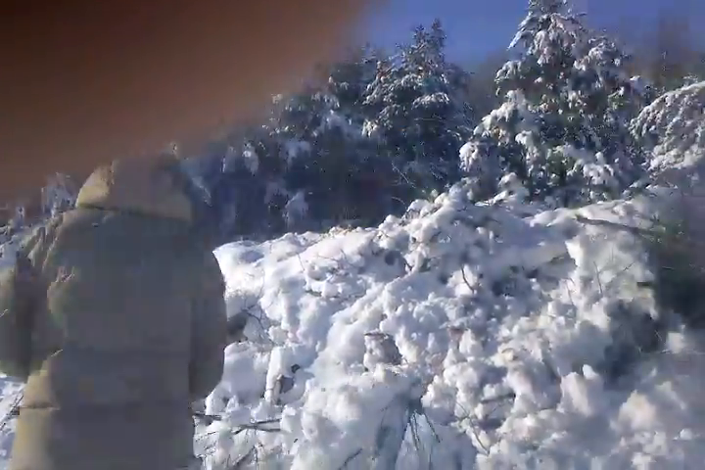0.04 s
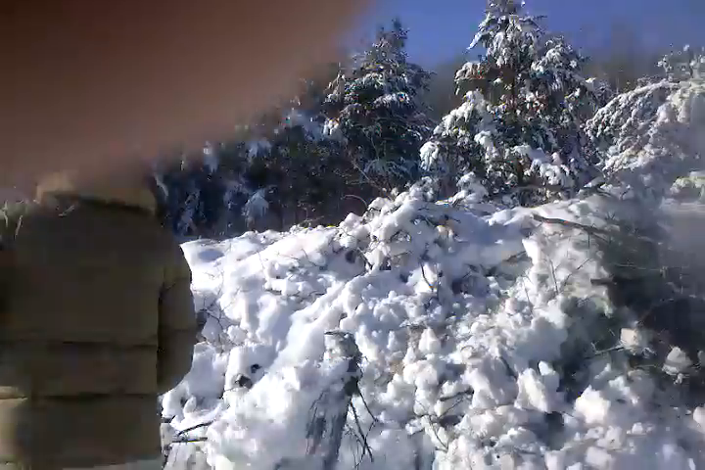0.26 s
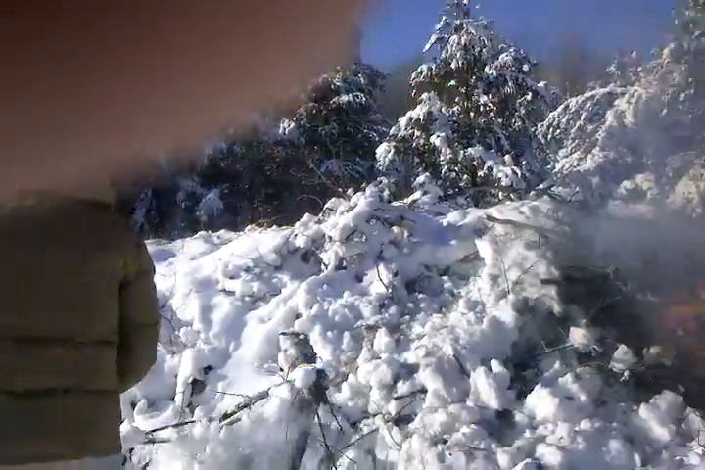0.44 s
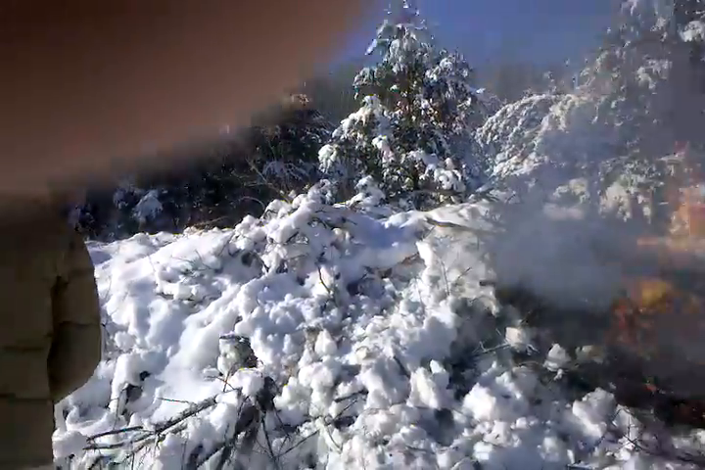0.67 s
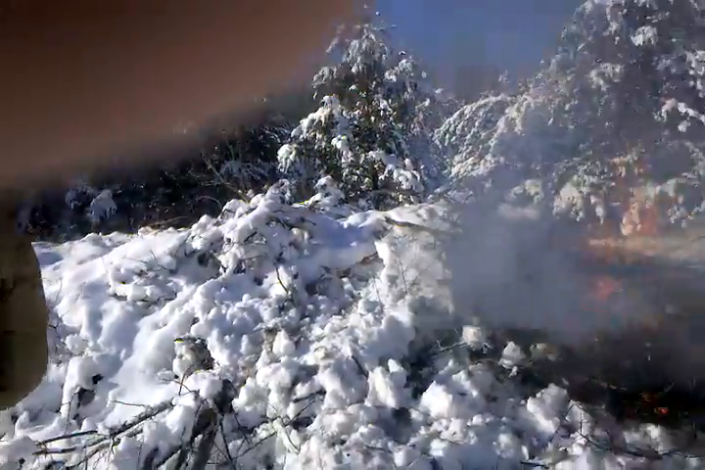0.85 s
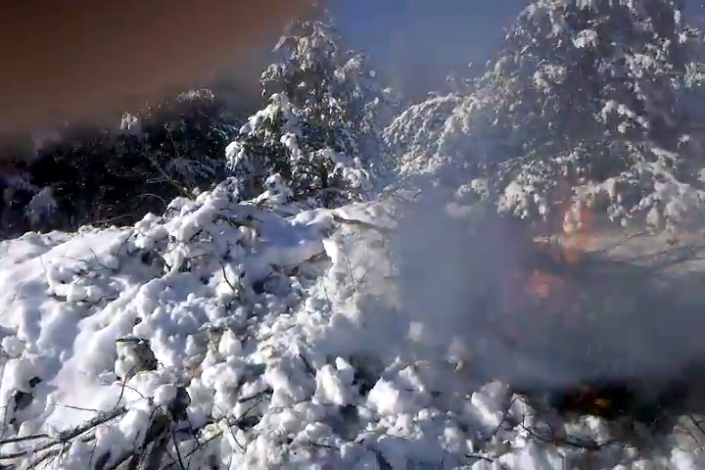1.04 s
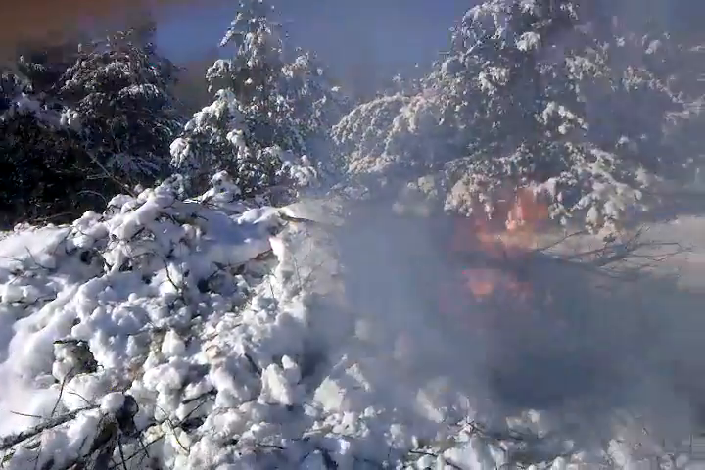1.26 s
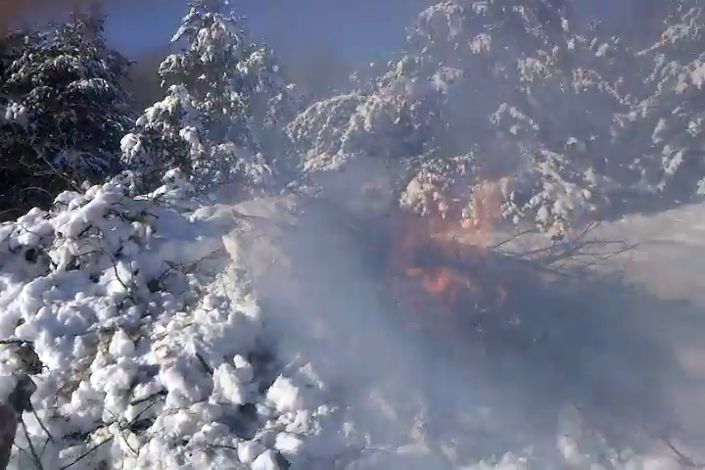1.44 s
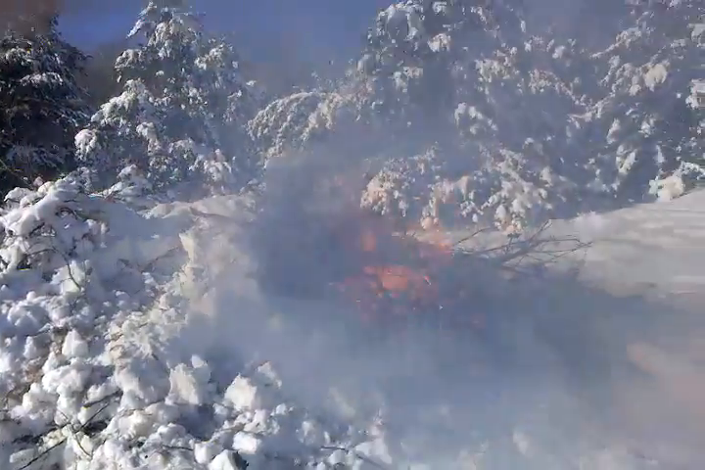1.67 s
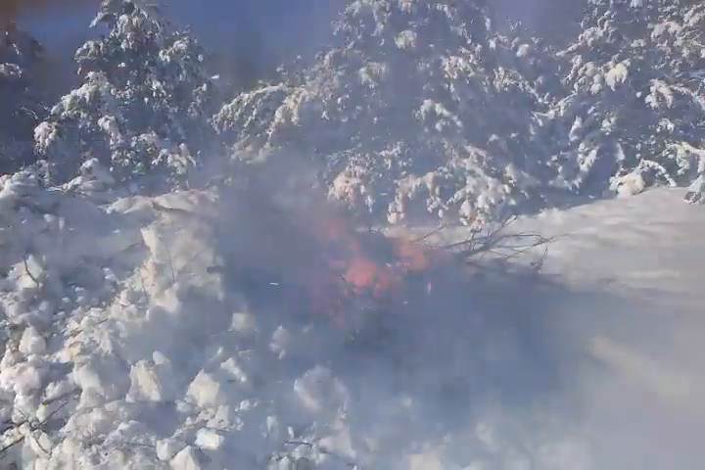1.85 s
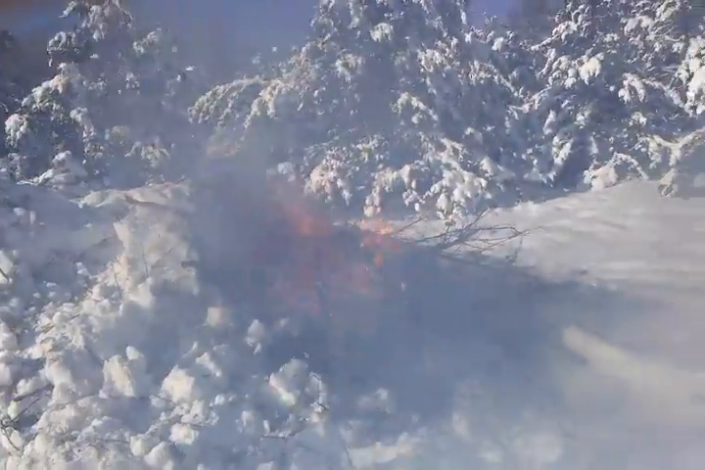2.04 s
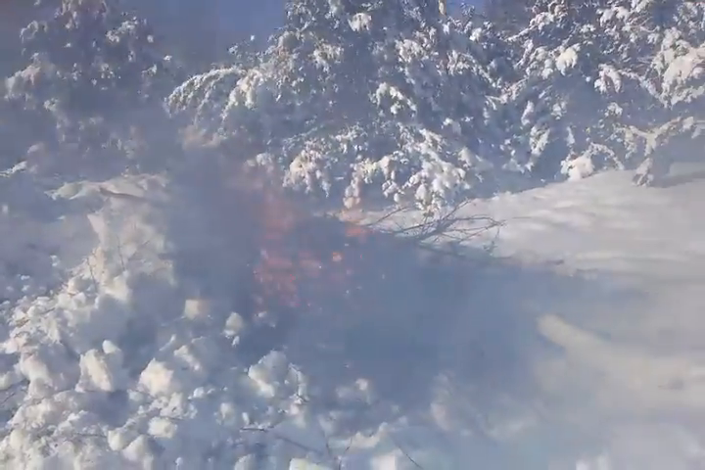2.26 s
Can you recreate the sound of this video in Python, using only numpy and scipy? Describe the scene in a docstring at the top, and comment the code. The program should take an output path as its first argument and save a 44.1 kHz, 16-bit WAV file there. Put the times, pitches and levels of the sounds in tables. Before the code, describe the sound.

Flames rush steadily in a pile of wet branches in a snowy clearing. A few quick snaps lead into one sharp pop, followed by hissing and faint crackles, with gentle wind buffeting the small microphone.

```python
"""Flames rush and wet twigs sizzle in a burning brush pile, while light wind rumbles on the microphone.
Twigs crackle as they split, and early on a steam pocket bursts a branch with one loud, woody pop.
The pile scatters that crack for a moment and the snowy clearing swallows the rest.
The fire burns on under soft bumps of air, heard through a small camera microphone with little treble."""
import sys
import numpy as np
from scipy import signal
from scipy.fft import rfft, irfft
from scipy.io import wavfile
from scipy.ndimage import uniform_filter1d

SR = 44100
rng = np.random.default_rng(int(sys.argv[2]) if len(sys.argv) > 2 else 0)


def pcm_store(signal):
    """Save signal as 16-bit PCM."""
    levels = np.round(np.clip(np.atleast_2d(signal), -1, 1) * 32767)
    wavfile.write(sys.argv[1], SR, levels.astype(np.int16).T)


N = 105840
T = np.arange(N) / SR

# strength of the flames (time [s], roar level [dB], rush level [dB])
FLAME_LEVELS = [(0, -62, -53), (.13, -60, -53.5), (.2, -65, -56.5), (.28, -67, -61), (.38, -69.5, -62.5),
                (.6, -64, -63), (.71, -66.5, -65), (.86, -64.5, -63), (.98, -64, -61.5), (1.13, -67.5, -59),
                (1.26, -65.5, -60.5), (1.35, -61.5, -63), (1.44, -59.5, -57.5), (1.53, -58, -52.5),
                (1.62, -58, -56), (1.8, -56.5, -56), (1.95, -58, -58), (2.17, -57.5, -60),
                (2.32, -56.5, -61), (2.4, -59.5, -58)]
# tone of the low roar, the brighter rush and the hollow flare (frequency [Hz], level [dB])
ROAR_TONE = [(120, -20), (260, -3), (370, -3.5), (550, -0.5), (750, -6.5), (1000, -11), (1600, -28.5),
             (4000, -47.5)]
RUSH_TONE = [(300, -23.5), (650, -1), (900, -1.5), (1100, -3.5), (1500, 2), (1850, 0), (2250, -3.5),
             (2900, -15.5), (4000, -8.5), (7500, -25.5)]
FLARE_TONE = [(200, -22), (500, -9), (800, 5.5), (1050, 2.5), (1400, 0.5), (1800, -6), (2400, -26),
              (5000, -32)]
# gusts that feed the fire (crest time [s], half width [s], rumble level [dB], flare level [dB])
WIND_GUSTS = [(0.282, 0.01, -54, -70), (1.067, 0.11, -75, -60), (1.189, 0.024, -49.5, -53.5),
              (1.324, 0.0083, -51, -69), (2.033, .028, -52.5, -64.5)]

# steam escaping from the wood (time [s], level [dB])
STEAM_LEVELS = [(0, -53.5), (.1, -51.5), (.22, -55), (.37, -54.5), (.46, -61), (.58, -60), (.72, -63.5),
                (.83, -65.5), (.95, -61.5), (1.04, -62), (1.13, -57.5), (1.26, -66), (1.38, -63.5),
                (1.48, -56), (1.66, -60.5), (1.72, -59), (1.78, -58), (1.92, -62.5), (2.03, -61),
                (2.12, -67.5), (2.32, -69), (2.4, -59)]
# short jets of steam (crest time [s], half width [s], level [dB])
STEAM_JETS = [(1.54, 0.029, -54), (1.655, 0.014, -56)]
# tone of the sizzle and of the jets (frequency [Hz], level [dB])
SIZZLE_TONE = [(1000, -39.5), (2200, -1), (3100, -7), (4000, -3.5), (4700, 0), (5500, 1), (6200, -2),
               (6600, 1), (7100, -3), (8000, -11.5)]
JET_TONE = [(1500, -24), (3000, -16), (4000, -2), (5200, 2), (6000, -6), (7000, -7), (8000, -15)]

# breeze on the microphone (time [s], level [dB])
BREEZE_LEVELS = [(0, -56), (.55, -57), (.78, -59), (.92, -56.5), (1.08, -61.5), (1.39, -53.5),
                 (1.65, -54.5), (1.8, -58.5), (1.99, -50), (2.17, -55), (2.4, -54.5)]
# tone of its rumble (frequency [Hz], level [dB])
RUMBLE_TONE = [(20, -32.5), (40, -16.5), (70, -2.5), (125, 0.5), (200, -1), (260, -6), (340, -17),
               (600, -22.5), (2000, -53.5)]
# soft bumps of air on the microphone (time [s], frequency [Hz], envelope level [dB])
AIR_BUMPS = [(.339, 254, -40.5), (0.466, 191, -44), (0.485, 170, -51), (0.57, 180, -48), (.62, 290, -49),
             (1.206, 139, -40), (1.314, 115, -39), (1.327, 120, -40), (1.393, 130, -49),
             (1.477, 208, -43.5), (1.69, 203, -41.5), (1.881, 178, -33.5), (2.024, 198.5, -39),
             (2.055, 198, -39)]

# splitting twigs (time [s], tick level [dB], body level [dB], decay t60 [s])
TWIG_SNAPS = [(0.0367, -31.5, -43, 0.0077), (0.0514, -38, -37.5, 0.0087), (.073, -44, -46, 0.011),
              (0.0972, -26, -29.5, 0.0059), (0.1666, -33.5, -46.5, .016), (.361, -45, -62, .008),
              (.557, -45, -60, .008), (.622, -52, -67, 0.22), (.786, -59, -55.5, 0.043),
              (.851, -48, -50.5, 0.018), (0.9187, -45, -54, .045), (.942, -61, -66, .015),
              (1.1497, -54, -47, 0.011), (1.607, -51, -45, 0.011), (1.856, -50.5, -60, 0.035),
              (2.022, -53, -56, .03), (2.047, -53, -59, .04), (2.355, -54, -58, 0.049)]
# tone of their bright tick and woody body (frequency [Hz], level [dB])
TICK_TONE = [(300, -29), (2200, -14), (3300, -11), (4300, 2.5), (5500, 3), (6600, 3.5), (7200, -3),
             (8000, -13)]
BODY_TONE = [(300, -24), (1400, -11.5), (2200, 2), (2800, -1.5), (3400, -3), (4400, -4), (5500, -7),
             (8000, -20)]

# the pop's two hits: the bark gives, then the steam pocket bursts (time [s], relative level [dB])
POP_HITS = [(0.1904, -8.5), (.1913, 3)]
# ring of the splitting branch (frequency [Hz], level [dB], decay t60 [s])
BRANCH_MODES = [(494, -31, .012), (615, -36, .07), (800, -40, .07), (975, -31, .043), (1320, -18, .008),
                (2075, -31, .08), (2244, -11, .01), (2990, -18, .02), (3436, -15, .015), (4029, -19, .005),
                (5540, -11, .014), (6132, -26, .033), (6480, -14, .008)]
# tone of the tearing fibres and of their scatter in the pile (frequency [Hz], level [dB])
TEAR_TONE = [(200, -24), (450, -4), (1250, 0), (1750, -3.5), (2250, 2.5), (3400, 0.5), (4400, -3.5),
             (5000, -8), (5600, -3), (6700, 0), (9000, -14.5)]
SCATTER_TONE = [(100, -23), (400, 0.5), (900, 0), (1500, -3), (2200, 0.5), (3200, -5), (4400, -1),
                (6000, -6), (8000, -7)]


def undb(db):
    return 10 ** (np.asarray(db) / 20)


def unit_rms(x):
    return x / np.sqrt(np.mean(x ** 2))


def fader(table, column=1):
    """Gain that rides a column of dB points through time."""
    rows = np.array(table)
    return undb(np.interp(T, rows[:, 0], rows[:, column]))


def colour(x, tone):
    """Minimum-phase EQ through (Hz, dB) points that keeps the power of white noise."""
    hz, db = np.array(tone).T
    size = 4096
    bins_hz = np.maximum(np.fft.rfftfreq(size, 1 / SR), 1)
    gain = undb(np.interp(np.log(bins_hz), np.log(hz), db))
    cepstrum = irfft(np.log(gain))
    cepstrum[1:size // 2] *= 2  # folded forward, so nothing rings ahead of a hit
    cepstrum[size // 2 + 1:] = 0
    impulse = irfft(np.exp(rfft(cepstrum)))
    return signal.fftconvolve(x, impulse / np.linalg.norm(impulse))[:N]


def noise():
    return rng.standard_normal(N)


def flicker(rate_hz, depth_db):
    """A gain that wanders at random about one."""
    window = int(SR / rate_hz)
    drift = uniform_filter1d(uniform_filter1d(noise(), window), window)
    return undb(depth_db * unit_rms(drift))


def swell(at, half_width):
    """A bell-shaped rise and fall."""
    return np.exp(-.5 * ((T - at) / half_width) ** 2)


def decay(start, t60):
    """Hard attack and exponential tail."""
    return (T >= start) * np.exp(-np.log(1000) * np.maximum(T - start, 0) / t60)


def grit():
    """A dense run of equally strong snaps of random polarity."""
    return np.sign(noise())


def flames():
    """A fluttering low roar, a brighter rush, and a hollow flare when a gust feeds the fire."""
    flutter = flicker(rate_hz=23, depth_db=0.75)
    roar = colour(noise(), ROAR_TONE) * fader(FLAME_LEVELS, column=1)
    roar *= flicker(rate_hz=15, depth_db=0.75)
    rush = colour(noise(), RUSH_TONE) * fader(FLAME_LEVELS, column=2)
    fanning = sum(undb(db) * swell(at, half) for at, half, _, db in WIND_GUSTS)
    flare = colour(noise(), FLARE_TONE) * fanning
    return flutter * (roar + rush + flare)


def sizzle(bursts_per_s=900, spread_db=2, burst_share=.4):
    """Steam hisses out of wet wood among countless tiny bursts, and twice in a jet."""
    bursts = (rng.random(N) < bursts_per_s / SR) * grit()
    bursts *= undb(spread_db * np.minimum(rng.exponential(size=N), 4))
    steam = np.sqrt(burst_share) * unit_rms(bursts) + np.sqrt(1 - burst_share) * noise()
    jets = colour(noise(), JET_TONE) * sum(undb(db) * swell(at, half) for at, half, db in STEAM_JETS)
    hiss = colour(steam, SIZZLE_TONE) * fader(STEAM_LEVELS) * flicker(rate_hz=25, depth_db=1.45)
    return hiss + jets


def wind():
    """Turbulence rumbles on the microphone; single eddies give it a brief push and pull."""
    gusts = sum(undb(db) * swell(at, half) for at, half, db, _ in WIND_GUSTS)
    rumble = colour(noise(), RUMBLE_TONE) * (fader(BREEZE_LEVELS) + gusts)
    bumps = sum(undb(db) * swell(at, 0.45 / hz) * np.sin(2 * np.pi * hz * (T - at))
                for at, hz, db in AIR_BUMPS)
    return rumble + bumps


def crackles():
    """Twigs split in short bursts: a bright tick, and a woody body for the thicker ones."""
    tick = grit() * sum(undb(db) * decay(at, t60) for at, db, _, t60 in TWIG_SNAPS)
    body = grit() * sum(undb(db) * decay(at, t60) for at, _, db, t60 in TWIG_SNAPS)
    return colour(tick, TICK_TONE) + colour(body, BODY_TONE)


def branch_pop(tear_db=-16.5, scatter_db=-26.5, echo_db=-23, echo_s=.0102):
    """A steam pocket splits a branch: fibres tear, the wood rings, the pile scatters the crack."""
    burst_at = POP_HITS[1][0]
    ring = sum((-1) ** k * undb(db) * decay(burst_at, t60) * np.sin(2 * np.pi * hz * (T - burst_at))
               for k, (hz, db, t60) in enumerate(BRANCH_MODES))
    tear_power = sum((undb(tear_db + db) * decay(at, t60=0.014)) ** 2 for at, db in POP_HITS)
    crack = ring + colour(grit() * np.sqrt(tear_power), TEAR_TONE)
    scatter = grit() * undb(scatter_db) * decay(burst_at, t60=0.064)
    echo = undb(echo_db) * np.interp(T - echo_s, T, crack)  # off hard-packed snow and logs
    tail = colour(scatter + echo, SCATTER_TONE)
    low_cut = signal.butter(3, 400, "high", fs=SR, output="sos")  # a thin branch radiates little bass
    return signal.sosfilt(low_cut, crack + tail)


def scene():
    """The layers of the fire and the wind, mixed in mono."""
    fire = flames() + sizzle() + crackles() + branch_pop()
    return (fire + wind())[None]


def record(dry):
    """The camera thins the deep bass and cuts the treble steeply."""
    low_cut = signal.butter(2, 79, "high", fs=SR, output="sos")
    treble_rolloff = signal.butter(20, 6947, "low", fs=SR, output="sos")
    brick_wall = signal.ellip(8, .2, 60, 7730, "low", fs=SR, output="sos")
    return signal.sosfilt(np.vstack([low_cut, treble_rolloff, brick_wall]), dry)


dry = scene()
out = record(dry)
pcm_store(out)
```